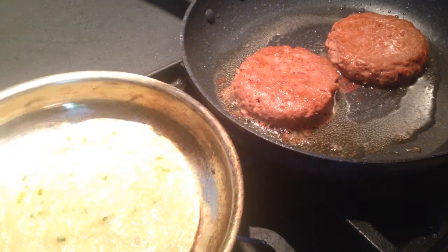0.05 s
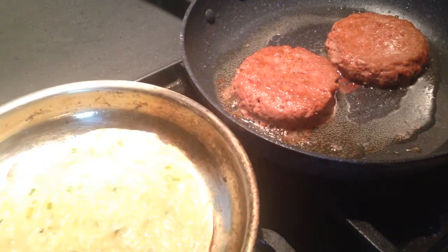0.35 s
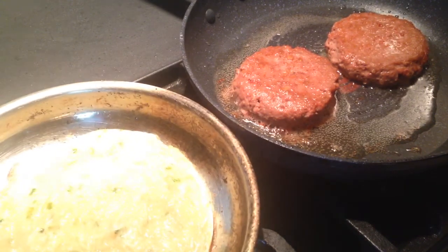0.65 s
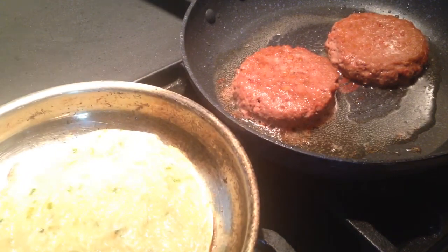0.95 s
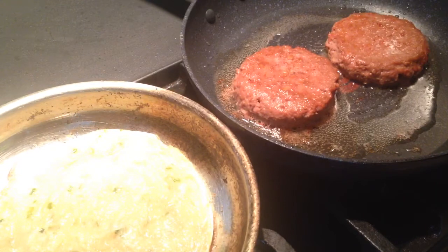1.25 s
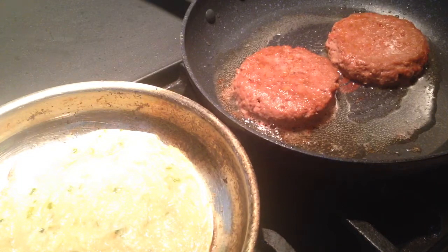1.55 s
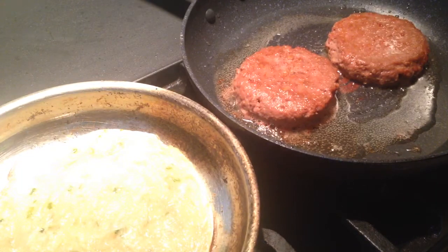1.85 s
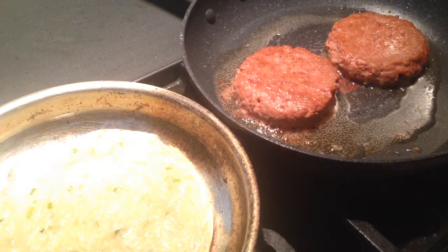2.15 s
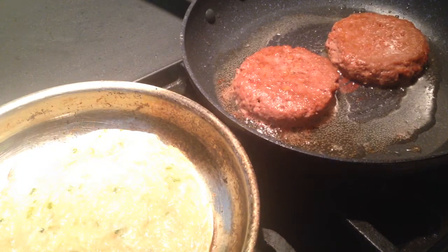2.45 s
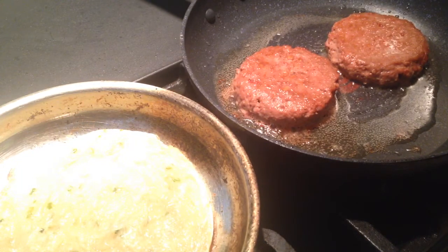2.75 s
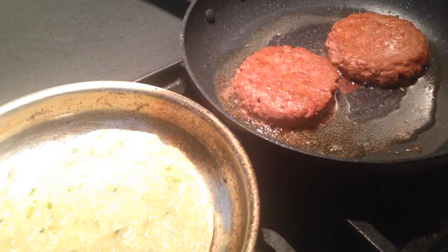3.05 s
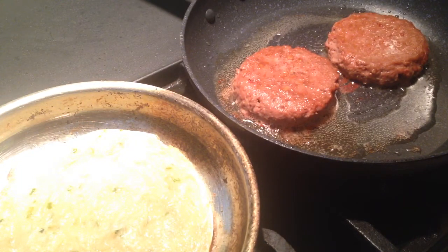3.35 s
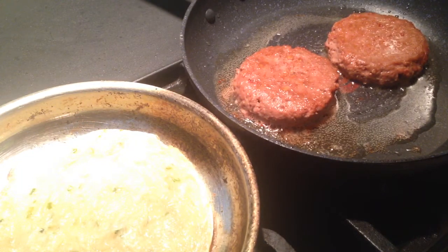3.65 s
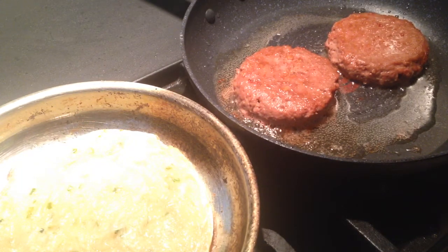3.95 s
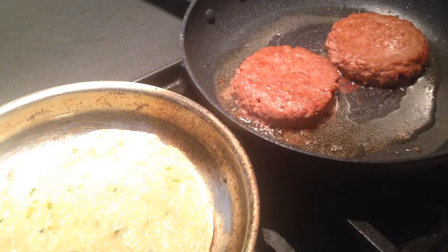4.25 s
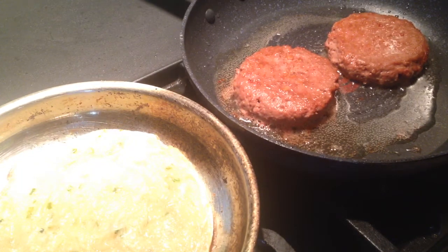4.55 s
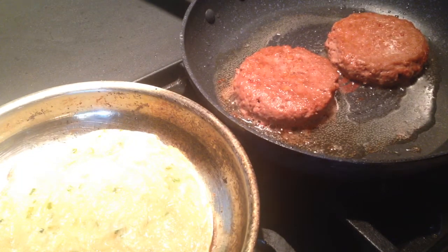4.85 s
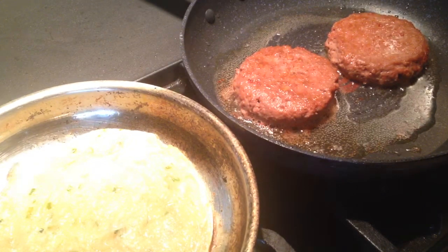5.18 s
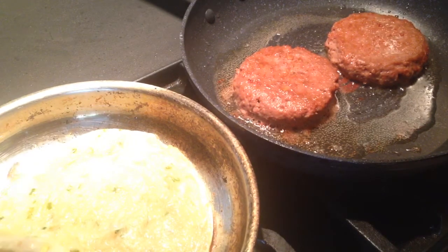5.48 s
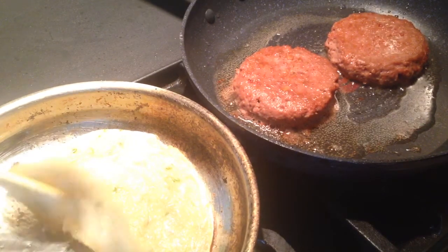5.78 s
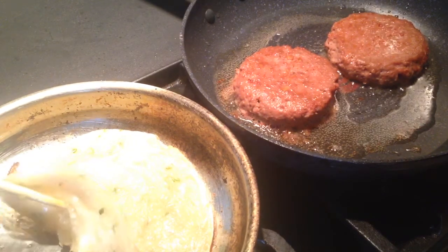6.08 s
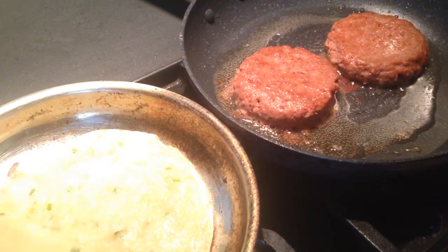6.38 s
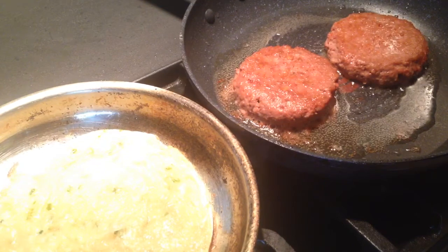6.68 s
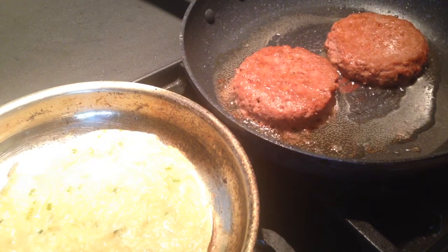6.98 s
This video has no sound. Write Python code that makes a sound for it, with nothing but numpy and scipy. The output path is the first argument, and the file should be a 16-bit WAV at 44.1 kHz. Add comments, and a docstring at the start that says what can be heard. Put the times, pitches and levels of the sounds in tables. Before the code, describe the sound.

Two patties sizzle and pop in oil while a steel pan clanks and rocks, and a spatula clinks and scrapes.

```python
"""A kitchen, close to a phone: two patties sizzle and spit in oil over a humming stove.
Tiny steam bubbles make the hiss, and droplets flashing to steam make the pops.
A steel pan beside them is shoved along its grate, squeals briefly and rocks whenever it is touched.
Later a spatula is picked up, clinks on that pan and slides under the food, which hisses afresh
on the hot metal."""
import sys
import numpy as np
from scipy import signal
from scipy.fft import rfft, irfft, next_fast_len
from scipy.io import wavfile
from scipy.ndimage import uniform_filter1d

SR = 44100
rng = np.random.default_rng(int(sys.argv[2]) if len(sys.argv) > 2 else 0)


def to_wav(sig):
    """Store sig (one row per channel, or 1-D mono) as 16-bit WAV at the path in sys.argv[1].

    Samples outside -1..1 are clipped; the rate is SR.
    """
    pcm = np.clip(np.atleast_2d(sig), -1, 1) * 32767
    pcm = np.round(pcm).astype(np.int16)
    wavfile.write(sys.argv[1], SR, pcm.T)  # frames by channels


N = 314076
T = np.arange(N) / SR
AGE = T[:SR // 2]  # time since a blow [s]
TOP_HZ = 15500
LOW_PASS = signal.ellip(8, .2, 70, TOP_HZ, fs=SR, output="sos")

# strokes of the spatula blade over the pan (time [s], length [s], level [dB])
BLADE_STROKES = [(4.73, 0.08, -65), (4.95, 0.068, -60), (5.85, 0.2, -55), (6.43, 0.11, -59),
                 (6.615, 0.16, -59), (6.762, 0.12, -56.5), (6.984, 0.043, -57)]


def undb(db):
    """Decibels to gain."""
    return 10 ** (np.asarray(db) / 20)


def level(x, db):
    """Scale to an rms level."""
    return x * undb(db) / np.sqrt(np.mean(x ** 2))


def peak_level(x, db):
    """Scale so that the loudest 2 ms have this level."""
    return x * undb(db) / np.sqrt(uniform_filter1d(x ** 2, size=88, mode="constant").max())


def band(x, hz, width_hz):
    """Two-pole resonance, gain 1 at its centre."""
    w = 2 * np.pi * min(hz, TOP_HZ) / SR
    a = np.sin(w) * width_hz / (2 * hz)
    return signal.lfilter([a, 0, -a], [1 + a, -2 * np.cos(w), 1 - a], x + 1e-18)


def steep_band(x, hz, width_hz):
    """The same resonance twice, for steeper skirts."""
    return band(band(x, hz, width_hz), hz, width_hz)


def colour(x, spectrum):
    """Equalise with a curve of (frequency [Hz], gain [dB])."""
    hz, db = np.transpose(spectrum)
    n = next_fast_len(len(x))
    bins_hz = np.maximum(np.fft.rfftfreq(n, 1 / SR), 1)
    gain = undb(np.interp(np.log(bins_hz), np.log(hz), db))
    return irfft(rfft(x, n) * gain, n)[:len(x)]


def walk(rate):
    """Smooth random drift of rms 1, turning about rate times a second."""
    hold = max(int(SR / rate), 1)
    steps = np.repeat(rng.standard_normal(N // hold + 1), hold)
    return level(uniform_filter1d(steps, hold)[:N], 0)


def fade(t60):
    """Exponential decay after a blow."""
    return np.exp(-np.log(1000) * AGE / t60)


def arch(age, length):
    """Swell and fall within length seconds."""
    return np.sin(np.pi * np.clip(age / length, 0, 1))


def burst(t60):
    """Noise that dies away."""
    return rng.standard_normal(len(AGE)) * fade(t60)


def ring(modes, waver):
    """Struck modes with random phases; their pitch wavers together by a small share."""
    clock = AGE + waver * np.cumsum(walk(90)[:len(AGE)]) / SR
    return sum(undb(db) * fade(t60) * np.sin(2 * np.pi * (hz * clock + rng.random()))
               for hz, t60, db in modes)


def add(out, s, x):
    """Mix a short sound in at time s."""
    i = max(int(s * SR), 0)
    out[i:i + len(x)] += x[:N - i]


def grains(rate, spread_db, size=N):
    """Random clicks, rate a second: mostly small, a few larger."""
    at = rng.integers(0, size, int(rate * size / SR))
    polarity = rng.choice([-1, 1], len(at))
    out = np.zeros(size)
    out[at] = polarity * undb(spread_db * np.minimum(rng.exponential(size=len(at)), 5))
    return out


def fizz(spectrum, rate, spread_db, flicker_db):
    """Countless tiny steam bubbles in eight size classes, each class flickering by itself."""
    bubbles = sum(level(band(grains(rate, spread_db), hz, .8 * hz), flicker_db * walk(14)) * np.sqrt(hz)
                  for hz in np.geomspace(700, 14000, num=8))
    return level(colour(bubbles, spectrum), 0)


def sizzle():
    """Oil bubbles under the patties: a bed of hiss that slowly sinks and wanders a little."""
    # tone of the frying oil (frequency [Hz], gain [dB])
    oil_eq = [(290, -31.5), (500, 0.5), (569, -1), (611, 0.5), (748, -3.5), (914, 2.5), (1090, 1.5),
              (1620, 2), (1750, 0.5), (3430, -1), (4700, -1), (14600, -1), (15500, -4.5)]
    start_db, sag_db_per_s, wander_db = -57, .28, .25
    oil_db = start_db - sag_db_per_s * T + wander_db * walk(3.32)
    return fizz(oil_eq, rate=1800, spread_db=1.5, flicker_db=1.0) * undb(oil_db)


def stove():
    """Low rush of the stove with a wavering hum."""
    # tone of the rush (frequency [Hz], gain [dB])
    rush_eq = [(15, -49), (25, -12), (54, -8.5), (76, -7.5), (102, -3), (297, -7.5), (350, -8.5),
               (687, -17), (752, -8), (810, -21.5), (900, -11), (1170, -23.5), (1980, -120)]
    rush = level(colour(rng.standard_normal(N), rush_eq), -66.5) * undb(.81 * walk(6))
    hum_hz = 80.7 + 1.3 * walk(10)
    hum = np.sin(2 * np.pi * np.cumsum(hum_hz) / SR)
    return rush + level(hum, -73.5)


def crackle():
    """Larger bubbles burst as sparse ticks, with now and then a ringing pip."""
    low = undb(-35) * band(grains(9, 1.6), 1500, 1400)
    middle = undb(-34.5) * band(grains(18, 1.7), 4300, 2800)
    high = undb(-36) * band(grains(12, 1.9), 9500, 8000)
    pips = undb(-27) * (band(grains(3, 1.3), 3500, 350) + band(grains(3, 1.3), 5200, 400))
    return low + middle + high + pips


def clack(db, hz, contact_ms):
    """Metal meets metal: a few cycles while they touch, then a short rattle."""
    push = AGE / (contact_ms / 1000)
    contact = push ** 2 * np.exp(-push) * np.sin(2 * np.pi * hz * AGE)
    rattle = steep_band(burst(.065), hz, .8 * hz)
    return peak_level(contact, db) + peak_level(rattle, db - 11)


def shove():
    """The shoved pan bangs on the grate, sets it ringing and skids to a stop."""
    # clacks as the pan hits and as it stops (time [s], level [dB], pitch [Hz], contact time [ms])
    bangs = [(0.0623, -28, 1800, 0.51), (0.0673, -21, 1446, 0.96), (0.197, -40.5, 700, 1.3),
             (0.2035, -38.5, 290, 2.5), (0.225, -43, 170, 4), (0.25, -45, 200, 4),
             (0.2084, -41.5, 620, 1.35), (0.2196, -42, 1130, 1.4)]
    # blows that ring pan and grate (time [s], level [dB])
    blows = [(.0626, -28.5), (.0663, -23), (.0741, -29.5)]
    # pan and grate ringing together (frequency [Hz], t60 [s], level [dB])
    grate_modes = [(140, .14, -19), (183, .17, -14), (295, .17, -17), (412, .13, -18), (715, .09, -19),
                   (810, .11, -16), (948, .07, -17), (1209, .085, -7), (1358, .045, -8), (1447, .06, -3),
                   (1870, .05, -9), (2319, .075, -12), (2440, .065, -16), (3520, .07, -20),
                   (4551, .03, -15), (4900, .05, -19), (6540, .07, -29), (6980, .07, -30)]
    # tone of steel grinding on the grate (frequency [Hz], gain [dB])
    grind_eq = [(59, -42.5), (100, -16), (278, -6.5), (514, -17.5), (882, -15.5), (1460, -10.5),
                (2140, -12.5), (2400, -16), (2700, -23), (3530, -18.5), (4120, -23.5), (5720, -29),
                (6540, -20), (7780, -33), (10000, -29), (13000, -47), (22000, -120)]
    out = np.zeros(N)
    for s, db, hz, contact_ms in bangs:
        add(out, s, clack(db, hz, contact_ms))
    for s, db in blows:
        crash = colour(burst(.08), grind_eq)
        clang = ring(grate_modes, waver=.007) * (1 - fade(.002))
        add(out, s, peak_level(clang, db) + peak_level(crash, db - 12))
    return out + skid(grind_eq)


def skid(grind_eq):
    """Steel slides on the grate: a rough, wavering squeal over a gritty scrape."""
    # course of the skid (time [s], level [dB], squeal pitch [Hz])
    course = [(.075, -60, 1400), (.098, -44, 1420), (.111, -50, 1340), (.125, -42, 1360), (.15, -41, 1465),
              (.178, -42, 1495), (.195, -50, 1530), (.212, -60, 1470)]
    times, levels, pitches = np.transpose(course)
    outside_s = abs(T - np.clip(T, times[0], times[-1]))
    envelope = undb(np.interp(T, times, levels) - 2000 * outside_s)  # fast fade at both ends
    hz = np.interp(T, times, pitches) * (1 + .0242 * walk(252))
    phase = 2 * np.pi * np.cumsum(hz) / SR
    whistle = level(band(rng.standard_normal(N), 2420, 130), -11)
    squeal = np.sin(phase) + whistle + undb(-26) * np.sin(5.8 * phase)
    scrape = colour(grains(3300, 2.2), grind_eq)
    roughness = undb(2 * walk(160))
    return envelope * (level(squeal * roughness, -.84) + level(scrape, -1.8))


def small_pops(per_s=3, db_range=(-60, -52), hz_range=(3200, 11000), snap_db=-6):
    """Lesser droplets burst at random: extra rows for pops()."""
    chance = rng.random((int(per_s * N / SR), 3))
    return [(when * N / SR, np.interp(size, (0, 1), db_range), np.interp(pitch, (0, 1), hz_range),
             snap_db) for when, size, pitch in chance]


def pops():
    """A droplet flashes to steam: a click, lower for a bigger drop; the oil snaps shut and sprays."""
    # the loudest droplets (time [s], level [dB], pitch [Hz], snap against the level [dB])
    droplets = [(0.1946, -25.5, 10500, -21), (0.3142, -29, 10500, -22), (0.393, -43.5, 9300, -12),
                (.7053, -39, 10000, -17), (.7858, -30, 10000, -18), (.8325, -46.5, 6560, -9),
                (.9178, -48.5, 6240, -10), (.9792, -50.5, 6300, -6), (1.0491, -48, 6240, -4),
                (1.062, -49, 4830, -8), (1.138, -53.5, 3280, -1), (1.2355, -28.5, 11500, -21),
                (1.443, -55, 1800, -6), (1.5445, -36, 10100, -17.5), (1.8717, -47, 6040, -2),
                (2.075, -50, 6500, -10), (2.1005, -40, 10430, -16), (2.146, -57, 4500, -2),
                (2.2802, -45.5, 12300, -18), (2.2908, -49, 8000, -8), (2.3032, -52, 9800, -4),
                (2.5435, -33, 13300, -28), (2.895, -54, 1800, -6), (2.9726, -55, 4400, -0.5),
                (3.162, -43, 10100, -12.5), (3.4176, -35, 10500, -15.5), (3.5396, -43, 11400, -16),
                (3.573, -50, 4240, -10), (3.643, -56, 4890, -4), (3.6788, -45.5, 9800, -11),
                (4.1335, -36, 11400, -17), (4.172, -48, 11300, -14), (5.407, -23.5, 7240, -15),
                (5.4621, -43, 6130, -7), (5.472, -44, 11000, -14), (5.535, -45, 7360, -12),
                (5.7146, -40.5, 7600, -14), (5.7753, -36, 9350, -14), (5.8166, -49, 3900, -9),
                (6.0319, -35, 9600, -8), (6.0368, -38, 10100, -12), (6.0554, -38.5, 10600, -17),
                (6.2126, -44.5, 6400, -12), (6.282, -43.5, 5100, -7), (6.3871, -33, 9700, -13.5),
                (6.4792, -38, 6030, -5), (6.54, -46, 7000, -12), (6.7089, -43.5, 7900, -7),
                (7.0846, -45, 6460, -10), (7.1089, -37.5, 4480, -3.5), (7.114, -30, 10900, -11.5)]
    snap_hz, spray_per_snap = 2600, .36  # a harder snap throws more spray
    out, kick = np.zeros(N), signal.unit_impulse(256)
    snap = steep_band(kick, snap_hz, 1.5 * snap_hz)
    for s, db, hz, snap_db in droplets + small_pops():
        click = signal.sosfilt(LOW_PASS, steep_band(kick, hz, 1.24 * hz))
        spray = band(burst(.07), .85 * hz, 1.3 * hz)
        add(out, s - .0001, peak_level(click, db))
        add(out, s + .0005, peak_level(snap, db + snap_db))
        add(out, s, peak_level(spray, db - 7 + spray_per_snap * snap_db))
    return out


def thud(db):
    """The stove top takes up a blow slowly and answers with a short rumble."""
    # tone of the stove top (frequency [Hz], gain [dB])
    thud_eq = [(25, -12), (60, -9), (130, 0), (200, 2.5), (300, .5), (480, -14), (700, -10), (1000, -9.5),
               (1300, -16), (3000, -44)]
    attack = (1 - fade(.015)) ** 2
    return peak_level(colour(burst(.3), thud_eq) * attack, db)


def knock(db, hz, ring_db, free_s):
    """One contact: a clack, a thud from the stove top, and the pan rings until it lands again."""
    # the pan ringing after a knock (frequency [Hz], t60 [s], level [dB])
    knock_modes = [(1346, .15, -10), (1940, .7, 0), (2350, .06, -3), (3004, .2, -15), (3600, .04, 1),
                   (3950, .05, 1)]
    softness = 1800 / hz  # a softer knock is lower, stays longer in contact and thuds more
    contact_ms = .52 * softness ** 2.5
    thud_db = db - 14 + 16.5 * np.log2(softness)
    damping = np.exp(-np.maximum(AGE - free_s, 0) / .008)
    tone = ring(knock_modes, waver=.002) * damping
    return clack(db, hz, contact_ms) + thud(thud_db) + undb(ring_db) * tone


def rocking():
    """The pan tips onto its grate, rebounds and settles with a last faint bounce."""
    # the pan rocking (time [s], level [dB], pitch [Hz], rebound time [s],
    # rebound against the level [dB], first ring [dB], rebound ring [dB])
    rocks = [(.1974, -31.5, 1700, .2109, -16, -58, -66), (.43, -66, 640, .446, -3, -80, -80),
             (.5236, -31, 1800, .6209, -7, -61, -56), (5.6312, -35, 1800, 5.6837, -4, -47.5, -51.5),
             (5.9124, -40.5, 1780, 5.9651, -8, -56, -64), (6.7414, -43, 1620, 6.789, -3, -66, -68)]
    settle_db, gap_share, pitch_share = -13, .773, .975  # each bounce comes sooner and a little lower
    out = np.zeros(N)
    for s, db, hz, rebound_s, rebound_db, first_ring_db, rebound_ring_db in rocks:
        gap = rebound_s - s
        bounces = ((0, first_ring_db), (rebound_db, rebound_ring_db),
                   (rebound_db + settle_db, rebound_ring_db + 2 * settle_db))
        for weaker_db, ring_db in bounces:
            add(out, s, knock(db + weaker_db, hz, ring_db, gap))
            s, gap, hz = s + gap, gap * gap_share, hz * pitch_share
    return out


def spits():
    """Steam squeezes through the oil in brief, pitched bursts of bubbles."""
    # jets of steam (time [s], relative level [dB], pitch [Hz], length [s])
    jets = [(1.388, -58, 3600, 0.016), (2.758, -67, 4400, 0.016), (3.552, -71, 4050, 0.33),
            (3.97, -65.5, 5170, 0.11), (4.928, -66, 4150, 0.023)]
    out = np.zeros(N)
    for s, db, hz, length in jets:
        jet = band(grains(250, .49, size=len(AGE)), hz, 600)
        add(out, s, level(jet, db + 6) * arch(AGE, length))
    return out


def spatula_scrape():
    """The blade rubs along the steel in small slips and catches now and then."""
    # the blade catching (time [s], level [dB])
    catches = [(5.279, -58), (5.988, -44), (6.441, -47), (6.619, -49)]
    slips = grains(1500, 1.2)
    rub = band(slips, 1660, 500) + band(slips, 2270, 220) + undb(6.5) * band(slips, 204, 190)
    out = level(rub, -2.9) * sum(undb(db) * arch(T - s, length) for s, length, db in BLADE_STROKES)
    for s, db in catches:
        judder = steep_band(rng.standard_normal(len(AGE)), 1950, 950)
        add(out, s, peak_level(judder * arch(AGE, .018), db))
    return out


def spatula_taps():
    """The lifted spatula taps the stove top: a hard edge rings high, a soft landing low with a thud."""
    # the taps (time [s], level [dB], pitch [Hz], thud against the level [dB])
    taps = [(5.0798, -50, 2450, -20), (5.1223, -46, 1050, -3), (5.1877, -46, 1050, -4)]
    # the spatula ringing (frequency [Hz], t60 [s], level [dB])
    spatula_modes = [(680, .11, -3), (820, .08, -3), (985, .05, -6), (1130, .06, -4), (1180, .07, 0),
                     (1600, .05, -10), (1900, .04, -12), (2230, .05, -9), (3025, .08, -10)]
    out = np.zeros(N)
    for s, db, hz, thud_db in taps:
        tap = band(ring(spatula_modes, waver=.007), hz, .56 * hz)
        add(out, s, peak_level(tap, db))
        add(out, s + .00806, thud(db + thud_db))
    return out


def sear():
    """Wet food meets hot steel: the hiss swells, holds and dies down, flaring with each blade stroke."""
    # tone of the fresh hiss (frequency [Hz], gain [dB])
    sear_eq = [(880, -9.5), (1500, -3), (1650, -4), (2070, -9), (2240, -5.5), (2860, -8), (6010, -2),
               (14200, -7), (15500, -31)]
    start_s, attack_s, hold_s, fade_db_per_s = 5.3, .13, 1.29, 6.5
    age = T - start_s
    cooling_db = fade_db_per_s * np.maximum(age - attack_s - hold_s, 0)
    flare_db = 2.3 * sum(arch(T - s, length) for s, length, _ in BLADE_STROKES)
    surge_db = 1.3 * walk(22)
    swell = np.clip(age / attack_s, 0, 1) * undb(-55.5 - cooling_db + flare_db + surge_db)
    return fizz(sear_eq, rate=2000, spread_db=4.0, flicker_db=1.5) * swell


def spatula_clink(at_s=5.829):
    """The blade strikes the pan: a bright clash, ringing steel and a faint thud."""
    # tone of the clash (frequency [Hz], gain [dB])
    clash_eq = [(300, -20), (820, -9), (1150, -18), (1900, -8), (2600, -13), (3850, -3), (5800, -13),
                (8000, -10), (9300, -14), (10500, -22), (14000, -27)]
    # the struck pan ringing (frequency [Hz], t60 [s], level [dB])
    pan_modes = [(361, .45, -20), (745, .06, -3), (822, .06, 1), (897, .06, 0), (1028, .3, -16),
                 (1355, .09, -5), (1925, .08, 0), (2226, .07, -2), (2875, .07, 2), (3828, .24, -6.5),
                 (4167, .36, -4.5), (4850, .07, -9), (5340, .48, -16), (6245, .3, -17), (8163, .12, -4.5)]
    clash = peak_level(colour(burst(.077), clash_eq), -33)
    tone = undb(-35.5) * ring(pan_modes, waver=.0012)
    out = np.zeros(N)
    add(out, at_s, clash + tone + thud(-52))
    return out


def kitchen(x, near_db, near_t60, far_db, far_t60):
    """Quick scatter off pan walls and stove top, then a faint room tail."""
    scatter = undb(near_db) * burst(near_t60) / np.sqrt(near_t60)
    tail = undb(far_db) * burst(far_t60) / np.sqrt(far_t60)
    response = (scatter + tail) * np.sqrt(2 * np.log(1000) / SR)  # dB is energy against the direct sound
    response[0] = 1
    return signal.fftconvolve(x, response)[:N]


def scene():
    """Spitting oil and clattering steel in the kitchen, over a dry bed of hiss and stove hum."""
    spatter = pops() + crackle() + spits()
    spatter = kitchen(spatter, near_db=-16, near_t60=.04, far_db=-24, far_t60=.4)
    metal = rocking() + shove() + spatula_taps() + spatula_scrape() + spatula_clink()
    metal = kitchen(metal, near_db=-12.5, near_t60=.06, far_db=-13, far_t60=.43)
    return (spatter + metal + sizzle() + sear() + stove())[None]


def record(dry):
    """The phone's microphone loses the deepest bass, and the top is cut."""
    low_cut = signal.butter(2, 30, "highpass", fs=SR, output="sos")
    return signal.sosfilt(LOW_PASS, signal.sosfilt(low_cut, dry))


dry = scene()
out = record(dry)
to_wav(out)
```